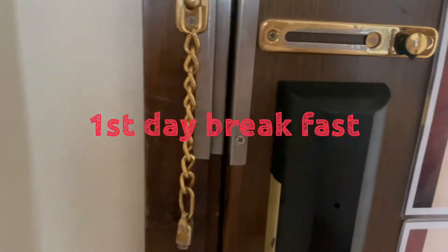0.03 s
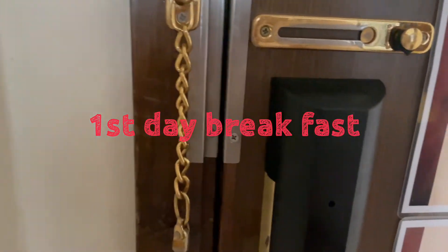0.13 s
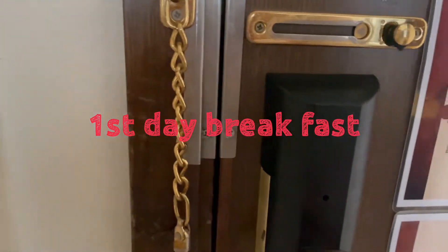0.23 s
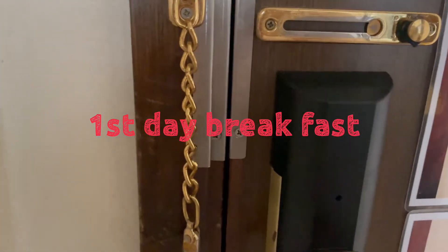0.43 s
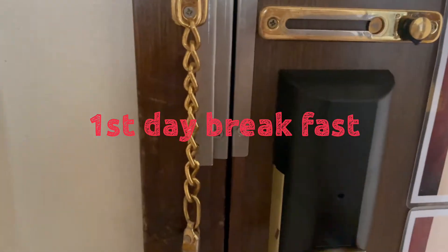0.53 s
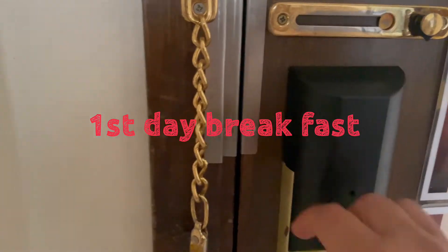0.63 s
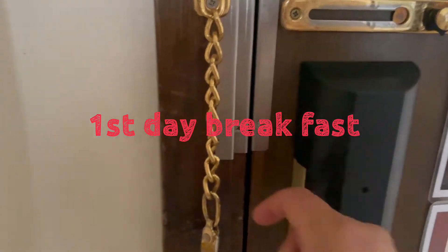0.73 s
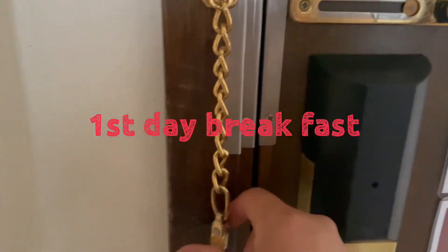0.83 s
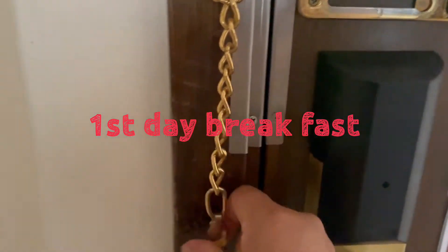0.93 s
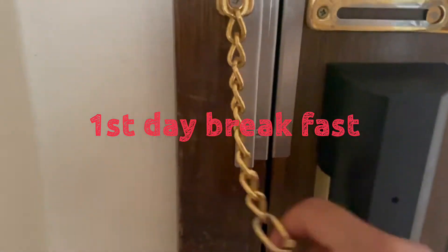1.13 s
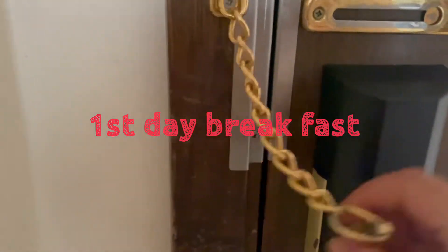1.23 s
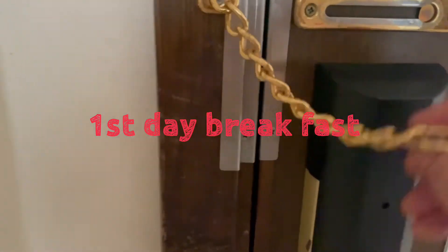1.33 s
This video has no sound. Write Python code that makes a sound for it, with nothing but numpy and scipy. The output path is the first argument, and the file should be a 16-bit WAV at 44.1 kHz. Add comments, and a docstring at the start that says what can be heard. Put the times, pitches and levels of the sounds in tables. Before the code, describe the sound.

A heavy room door shuts, heard close on a stereo phone microphone. Low ventilation hum runs throughout. At about 0.21 and 0.24 seconds the latch clacks twice, and loud woody thuds and panel knocks follow at once, with softer bumps and shuddering until 0.6. A sleeve rustles around 0.57 to 0.9, then a small chain clink at 0.92 and sparse faint metallic ticks until 1.4. Short indoor reverberation.

```python
"""Heavy room door and brass chain

In a ventilated room, close to a phone with two microphone ports, a heavy door falls shut. Bursts of noise
ring the lock case in two clacks; soft pushes and a low tremble ring the leaf as it thuds and shudders;
hard contacts ring its panels. Shaped noise makes the sleeve's rustle as a hand reaches for the brass chain,
short clicks make its links tick, and steady noise with two wavering tones makes the ventilation hum."""
import sys
import numpy as np
from scipy import signal
from scipy.fft import rfft, irfft, next_fast_len
from scipy.io import wavfile
from scipy.ndimage import uniform_filter1d, map_coordinates

SR = 44100
rng = np.random.default_rng(int(sys.argv[2]) if len(sys.argv) > 2 else 0)


def makeup_ratio(level_db):
    """Linear amplitude ratio for a level in decibels (20 dB per factor of ten)."""
    decades = np.asarray(level_db, float) / 20
    return 10 ** decades


def digitize_waveform(pressure):
    """Quantize a signal to 16-bit integers and store it at the path in sys.argv[1].

    Rows of a 2-D input are taken as channels; values are limited to [-1, 1].
    """
    field = np.atleast_2d(pressure).T
    bounded = np.clip(field, -1, 1)
    quanta = np.round(bounded * 32767).astype(np.int16)
    wavfile.write(sys.argv[1], SR, quanta)


N = 61740  # samples, 1.4 s


def unit(x):
    """Scale to rms 1."""
    return x / np.sqrt(np.mean(x ** 2) + 1e-20)


def along(points, hz):
    """Read (frequency, value) points on a log frequency axis."""
    f, v = np.transpose(points)
    return np.interp(np.log(hz + 1), np.log(f + 1), v)


def closed(points):
    """Gain of a spectrum that falls away outside its ends."""
    below, above = (points[0][0] / 2, -60), (points[-1][0] * 1.22, -90)
    return lambda hz: makeup_ratio(along([below] + list(points) + [above], hz))


def filtered(x, response):
    """Multiply the spectrum of x by a complex response of frequency."""
    n = x.shape[-1]
    m = next_fast_len(n + 8192)
    return irfft(rfft(x, m) * response(np.fft.rfftfreq(m, 1 / SR)), m)[..., :n]


def ringing(modes, sign):
    """Causal sum of resonances; the powers of sign weight them and set how neighbours meet."""
    def response(f):
        return sum(sign ** k * makeup_ratio(db) * 1j * f * width / (centre ** 2 - f * f + 1j * f * width)
                   for k, (centre, width, db) in enumerate(modes))
    return response


def wobble(rate):
    """A smooth random curve with rate knots a second."""
    knots = rng.standard_normal(int(N * rate / SR) + 4)
    return map_coordinates(knots, [np.arange(N) * rate / SR])


def burst(t60, rise_s):
    """Two unrelated noise bursts with a fast rise and a fading tail, cut off after 0.1 s."""
    t = np.arange(SR // 10) / SR
    return makeup_ratio(-60 * t / t60) * (1 - np.exp(-t / rise_s)) * rng.standard_normal((2, len(t)))


def add(into, s, x):
    """Mix x in at time s, in seconds."""
    part = into[:, round(s * SR):][:, :x.shape[1]]
    part += x[:, :part.shape[1]]


# ventilation air spectrum: (frequency [Hz], relative density [dB])
AIR_SPECTRUM = [(30, 5), (60, -13), (100, 2), (160, -4.5), (300, -10), (560, -16), (800, -14.5),
                (1300, -20.5), (2200, -26.5), (4000, -35.5), (6500, -41.5), (8500, -42.5), (9500, -60.5),
                (11500, -59)]
AIR_DB = -37.5
# ventilation tones: (frequency [Hz], drift [Hz], rms level [dB])
HUM_TONES = [(96.5, 0.94, -47.5), (228.9, 2.8, -40)]


def ventilation():
    """Steady air noise with two hum tones that waver slightly in pitch and level."""
    noise = filtered(rng.standard_normal((2, N)), closed(AIR_SPECTRUM))
    air = makeup_ratio(AIR_DB + 0.17 * wobble(9.9)) * unit(noise)
    quarter_turn = np.array([[0], [np.pi / 2]])  # keeps the two paths unrelated
    hum = 0
    for hz, drift, db in HUM_TONES:
        level = makeup_ratio(db + 3 + 0.7 * wobble(12))  # a sine peaks 3 dB over its rms
        phase = 2 * np.pi * np.cumsum(hz + drift * wobble(15)) / SR
        hum = hum + level * np.sin(phase + quarter_turn)
    return air + hum


# rustle of the sleeve: (time [s], level [dB])
SLEEVE_LEVEL = [(0, -34), (0.03, -61.5), (.52, -93), (0.572, -38.5), (0.611, -56), (0.65, -47), (.7, -46),
                (0.746, -42), (.775, -42.5), (0.805, -47.5), (0.881, -51.5), (1.098, -65), (1.4, -58.5)]
# cloth spectrum: (frequency [Hz], relative density [dB])
CLOTH_SPECTRUM = [(500, 13.5), (900, -2), (1500, 1.5), (2500, -6), (4500, -7), (8500, -10.5),
                  (10500, -17.5), (11500, -13)]


def sleeve():
    """Cloth rubbing: patchy noise with a grainy, fluttering level."""
    s, db = np.transpose(SLEEVE_LEVEL)
    level_db = np.interp(np.arange(N) / SR, s, db) + 0.5 * wobble(43.3) + 2 * wobble(300)
    z = signal.stft(rng.standard_normal((2, N)), nperseg=256)[2]
    # patches in frequency and time, the same on both paths
    patches = uniform_filter1d(rng.standard_normal(z.shape[1:]), size=6, axis=0)
    patches = uniform_filter1d(patches, size=10, axis=1)
    cloth = signal.istft(z * makeup_ratio(2 * unit(patches)), nperseg=256)[1][:, :N]
    return makeup_ratio(level_db) * unit(filtered(cloth, closed(CLOTH_SPECTRUM)))


# the leaf trembles on its hinges: (time [s], relative level [dB])
SHUDDER_LEVEL = [(0, -12.5), (.03, -21), (0.101, -50), (.2, -21.5), (.6, -24.5), (0.661, -28), (.75, -39),
                 (.82, -44), (.88, -37), (1.03, -30), (1.119, -59), (1.41, -32.5)]
# the leaf pushes against frame and seal: (time [s], relative level [dB], contact [ms])
LEAF_THUDS = [(.2495, 4.5, 0.99), (.2535, -0.5, 2.25), (.2575, -23, 1), (.2635, 3.5, 3.7), (.276, 7, 8.4),
              (.2845, -5.5, 0.66), (.291, -5.5, 0.28), (.2965, -8.5, 0.4), (.303, -6, 2.64),
              (.313, -2.5, 6.4), (.3195, -19.5, 2.6), (.343, -24.5, 2.1), (.377, -5, 2.17),
              (.39, -5.5, 5.2), (.43, -15, 2.8), (.439, 5.5, 7.76), (.464, -0.5, 5.85), (.484, -2.5, 7),
              (.502, -2.5, 5.64), (.521, -4, 8.3), (.585, -17.5, 12.3), (.612, -8.5, 9.5)]
# door leaf modes: (frequency [Hz], width before the least widths apply [Hz], relative level [dB])
LEAF_MODES = [(34.8, 11.6, -1), (69, 11.8, 5), (88.2, 15, 2.5), (107.5, 15, 1), (176.5, 23, 5.5),
              (246.2, 14, 5), (333, 29.5, 6.5), (368, 64, 0), (388, 24, 4.5), (455, 85, 3.5)]
SHUDDER_HZ, LEAF_TOP_HZ = 148, 520  # corners of the tremble and of the whole force
LEAST_DAMPING = 0.05  # least width of a wood mode over its pitch
LEAST_WIDTH_HZ = 19  # the seal damps the low modes


def leaf():
    """Soft pushes of alternating direction and a low tremble ring the modes of the door."""
    shudder = makeup_ratio(np.interp(np.arange(N) / SR, *np.transpose(SHUDDER_LEVEL), left=-120, right=-120))
    tremble = filtered(rng.standard_normal((2, N)), lambda f: 1 / (1 + (f / SHUDDER_HZ) ** 4))
    force = shudder * 9 * tremble
    for k, (s, db, ms) in enumerate(LEAF_THUDS):
        u = np.minimum(np.arange(SR // 25) / SR * 1000 / max(ms, 0.2), 1)
        push = np.sin(np.pi * u) ** 2
        grit = 1 + 0.1 * rng.standard_normal((2, len(u)))
        add(force, s, (-1) ** k * makeup_ratio(db) * 90 * grit * push / push.sum())
    modes = [(hz, max(w, LEAST_DAMPING * hz, LEAST_WIDTH_HZ), db) for hz, w, db in LEAF_MODES]
    force = filtered(force, lambda f: 1 / (1 + 1j * f / LEAF_TOP_HZ) ** 2)
    return np.array([filtered(force[0], ringing(modes, -0.92)), filtered(force[1], ringing(modes, 0.96))])


# deep tone of the leaf on its seal: (frequency [Hz], relative level [dB], start [s], rise [s], t60 [s])
ROCK_TONE = (44, -18, -5, 17, 1.4)


def rocking():
    """A deep tone that starts long before the scene and has faded below hearing when it opens."""
    hz, db, s, rise_s, t60 = ROCK_TONE
    t = np.maximum(np.arange(N) / SR - s, 0)
    quarter_turn = np.array([[0], [np.pi / 2]])
    level = makeup_ratio(db - 60 * t / t60) * (1 - np.exp(-t / rise_s))
    return level * np.sin(2 * np.pi * hz * t + quarter_turn)


# two clacks of latch and lock, each a bright crack with duller rattling around it:
# (time [s], relative level [dB], t60 [s], bottom [Hz], top [Hz])
LATCH_CLACKS = [(0.2088, -11, 0.011, 4000, 13800), (0.2113, -15.5, 0.021, 400, 8000),
                (0.2151, -18, 0.039, 600, 6700), (.222, -27.5, 0.22, 200, 3400),
                (0.2367, -13.5, 0.0093, 300, 6960), (0.2385, -10, 0.022, 2500, 13900),
                (0.2422, -19, 0.024, 500, 9100), (0.2448, -22.5, 0.046, 300, 7900)]
# colour of the metal cracks: (frequency [Hz], gain [dB])
LATCH_COLOUR = [(300, -4.5), (500, 7.5), (1000, -11), (2500, -8), (4000, -21.5), (6000, -15.5),
                (11500, -27.5)]
# lock case modes: (frequency [Hz], width [Hz], relative level [dB])
LOCK_MODES = [(1380, 230, -3.5), (1993, 195, 8), (2670, 112, -1), (4065, 350, 11), (5020, 340, 3),
              (6260, 1700, 4.5), (8490, 710, 4.5), (10000, 750, 10.5)]
LOCK_RING = 1.335  # ringing against the plain crack


def latch():
    """Metal cracks that ring the lock case briefly."""
    out = np.zeros((2, N))
    for s, db, t60, low_hz, top_hz in LATCH_CLACKS:
        def band(f):
            return (1j * f / (low_hz + 1j * f)) ** 2 / (1 + 1j * f / top_hz) ** 3
        add(out, s, makeup_ratio(db + 24.5) * filtered(burst(t60, rise_s=0.00054), band))
    ring, colour = ringing(LOCK_MODES, -1.03), closed(LATCH_COLOUR)
    return filtered(out, lambda f: colour(f) * (1 + LOCK_RING * ring(f)))


# hard contacts that ring the panels: (time [s], relative level [dB])
PANEL_KNOCKS = [(.2415, 19), (0.2516, 9), (0.2822, 23), (0.2906, 18), (0.32, 6.5), (0.335, 9.5),
                (0.378, 0.5)]
# panel modes: (frequency [Hz], relative level before scatter [dB])
PANEL_MODES = [(588, 8), (645, 0), (775, -1.5), (890, -1), (1075, 1.5), (1170, 5.5), (1250, -3.5),
               (1335, -1), (1770, -2), (1860, -8), (2005, -3.5), (2290, -6.5)]
PANEL_WIDTH_HZ, PANEL_SCATTER_DB = 55, 3


def panels():
    """Each hard contact rings the panel modes anew; squared resonances make them swell softly."""
    out = np.zeros((2, N))
    blow = np.eye(1, SR // 8)[0]  # a single impulse
    sign = np.array([[-1], [1]])  # neighbouring modes oppose on the first path only
    for s, db in PANEL_KNOCKS:
        scatter = PANEL_SCATTER_DB * rng.standard_normal(len(PANEL_MODES))

        def response(f):
            return sum(sign ** k * makeup_ratio(d + a) * ringing([(hz, PANEL_WIDTH_HZ, 0)], 1)(f) ** 2
                       for k, ((hz, d), a) in enumerate(zip(PANEL_MODES, scatter)))
        add(out, s, makeup_ratio(db) * filtered(blow, response))
    return out


# small ticks and bumps, lock parts settling, then fingers and chain links:
# (time [s], relative level [dB], centre [Hz], width [octaves], t60 [s])
CHAIN_TICKS = [(.284, -37.5, 4000, 0.74, 0.23), (0.3298, -32.5, 4500, 0.94, 0.038),
               (0.345, -31, 3000, 0.46, 0.012), (0.4497, -37.5, 3600, 0.57, 0.044),
               (0.4787, -37.5, 5500, 0.78, 0.02), (0.556, -39.5, 1100, 0.87, 0.11),
               (.5715, -37, 2510, 0.48, 0.0087), (0.59, -39, 4500, 1, 0.023),
               (0.824, -41, 7000, 1.4, 0.016), (0.883, -51, 4500, 0.53, 0.013),
               (0.9243, -24, 4850, 0.3, 0.013), (0.9243, -33, 9500, 0.52, 0.013),
               (.912, -23, 794, 0.27, 0.14), (0.934, -19.5, 880, 0.2, 0.053),
               (0.9874, -26.5, 11000, 0.47, 0.017), (0.9878, -26, 3000, 0.94, 0.014),
               (.994, -35.5, 2300, 1.6, 0.019), (1.0564, -41.5, 7500, 0.89, 0.019),
               (1.07, -41.5, 6260, 0.58, 0.021), (1.102, -33, 2060, 1.74, 0.014),
               (1.118, -39, 6360, 0.43, 0.008), (1.1631, -34, 5700, 0.32, 0.012),
               (1.2006, -34, 4800, 1.3, 0.028), (1.2035, -48, 2200, 0.91, 0.016),
               (1.286, -47.5, 7500, 0.83, 0.039), (1.38, -39, 3500, .8, 0.0097)]
# brass modes before scatter: (frequency [Hz], width [Hz], relative level [dB])
LINK_MODES = [(1500, 540, 8), (2500, 400, 12), (3580, 770, 1), (5110, 250, 6.5), (6550, 430, -2.5),
              (8440, 460, 6.5), (11000, 260, -9)]
LINK_RING, LINK_SCATTER_DB = 1.6, 1.5  # ringing against the plain click; spread of mode levels
TICK_RISE_S = 0.00042


def ticks():
    """Short clicks, each with its own centre, ringing the brass anew."""
    out = np.zeros((2, N))
    for s, db, hz, octaves, t60 in CHAIN_TICKS:
        scatter = rng.standard_normal((len(LINK_MODES), 2))
        modes = [(c * (1 + 0.02 * a), w, d + LINK_SCATTER_DB * b)
                 for (c, w, d), (a, b) in zip(LINK_MODES, scatter)]
        ring = ringing(modes, -1)

        def bell(f):
            return np.exp(-0.5 * (np.log2((f + 1) / hz) / octaves) ** 2) * (1 + LINK_RING * ring(f))
        add(out, s, makeup_ratio(db) * filtered(burst(t60, TICK_RISE_S), bell))
    return out


# decay of the room: (frequency [Hz], t60 [s])
ROOM_DECAY = [(60, 0.92), (250, 0.56), (1000, 0.46), (4000, 0.21), (10000, 0.11)]


def room(x):
    """The room's answer, delayed 300 samples; each frequency dies at its own speed."""
    hz, t, z = signal.stft(rng.standard_normal((2, SR)), SR, nperseg=256)
    fade = makeup_ratio(-60 * t / along(ROOM_DECAY, hz)[:, None])
    tail = signal.istft(z * fade, SR, nperseg=256)[1]
    late = np.pad(x, ((0, 0), (300, 0)))
    return signal.fftconvolve(late, tail / np.linalg.norm(tail[0]), axes=1)[:, :N]


def ports(pair, alike, left):
    """Two unrelated sound paths become what both microphone ports share and what they do not."""
    def turn(hz):
        return np.arccos(np.clip(along(alike, hz), -1, 1)) / 2
    mid, side = filtered(pair, lambda hz: np.array([np.cos(turn(hz)), np.sin(turn(hz))]))
    balance = lambda hz: makeup_ratio(np.outer([0.5, -0.5], along(left, hz)))
    return filtered(np.array([mid + side, mid - side]), balance)


# door and chain at the ports: (frequency [Hz], left-right likeness [-1 to 1])
DOOR_LIKENESS = [(60, 1), (250, 0.98), (420, 0.25), (550, -0.83), (800, 0.39), (1500, -0.36), (6000, 0.09),
                 (9000, -0.59), (12000, -0.52)]
# door and chain at the ports: (frequency [Hz], left over right [dB])
DOOR_BALANCE = [(60, -0.5), (200, 8.5), (350, 5.5), (520, 0.5), (2000, 0.6), (3500, 8.5), (5500, 4.5),
                (8200, 8), (12000, -2.5)]
# cloth and air at the ports: (frequency [Hz], left-right likeness [-1 to 1])
AIR_LIKENESS = [(60, 0.9), (250, 0.98), (420, 0.17), (500, -0.79), (660, -0.8), (780, 0.2), (1100, -0.13),
                (6500, 0.16), (9000, -0.26), (12000, -0.54)]
# cloth and air at the ports: (frequency [Hz], left over right [dB])
AIR_BALANCE = [(60, -2), (250, 4.5), (520, 2.5), (2000, 3), (3500, 3.5), (5500, 9.5), (8300, 3.5),
               (12000, -0.5)]
ROOM_DB = -14


def scene():
    """Door, lock and chain in the room, over cloth and air."""
    door = latch() + leaf() + panels() + rocking() + ticks()
    near = ports(door + makeup_ratio(ROOM_DB) * room(door), DOOR_LIKENESS, DOOR_BALANCE)
    return near + ports(sleeve() + ventilation(), AIR_LIKENESS, AIR_BALANCE)


# phone casing: (frequency [Hz], width [Hz], depth [0 to 1])
CASING_NOTCHES = [(5580, 74, 1), (7500, 132, 1)]
TOP_HZ, MIC_LOW_HZ = 12200, 35.7  # band limit and low corner of the microphone


def microphone(dry):
    """The casing notches the treble; the microphone loses the deepest bass and all above its band."""
    def response(hz):
        notches = np.prod([1 - np.clip(d, 0, 1) / (1 + ((hz - c) / w) ** 2)
                           for c, w, d in CASING_NOTCHES], axis=0)
        return notches * (hz < TOP_HZ) * hz ** 2 / (hz ** 2 + MIC_LOW_HZ ** 2)
    return filtered(dry, response)


def low_pass(x):
    """Removes everything above the highest recorded frequency."""
    return signal.sosfilt(signal.butter(12, 12350, fs=SR, output="sos"), x)


def record(dry):
    """The phone's microphone hears the scene, and its input clips the peaks with a rounded knee."""
    clip_hard = 8  # higher is a sharper knee
    x = microphone(dry)
    mix = x / (1 + np.abs(x) ** clip_hard) ** (1 / clip_hard)
    return low_pass(mix)


dry = scene()
out = record(dry)
digitize_waveform(out)
```